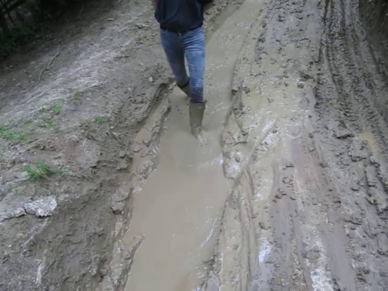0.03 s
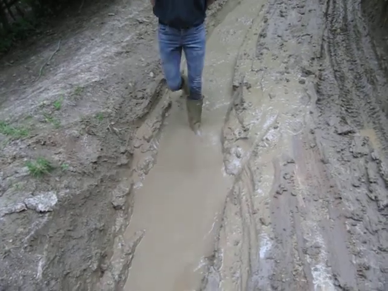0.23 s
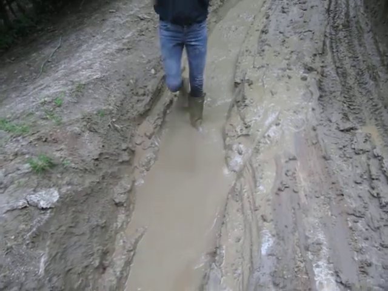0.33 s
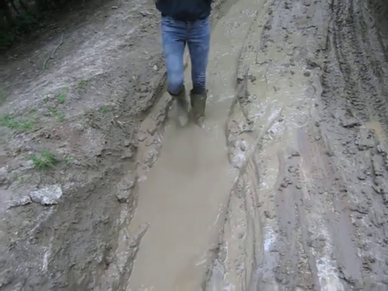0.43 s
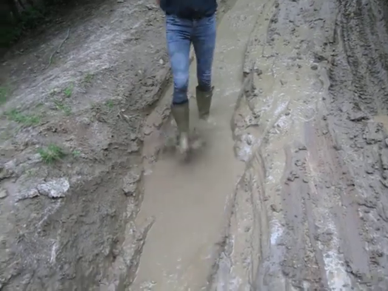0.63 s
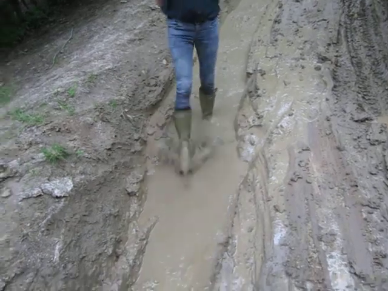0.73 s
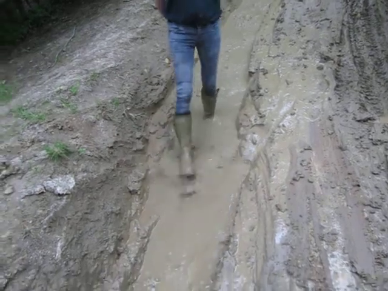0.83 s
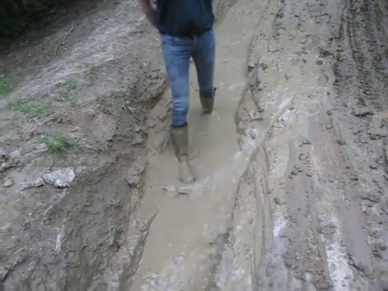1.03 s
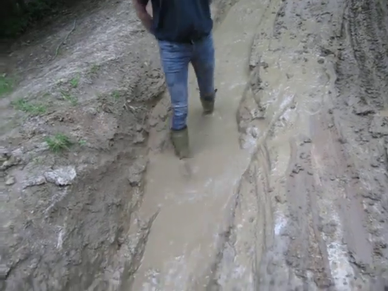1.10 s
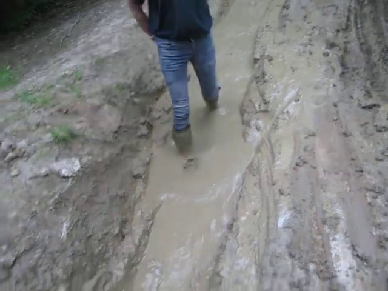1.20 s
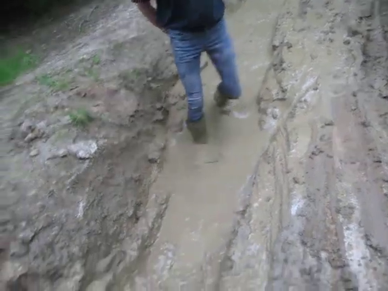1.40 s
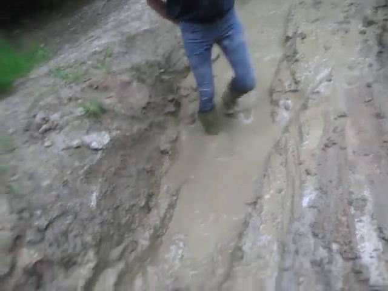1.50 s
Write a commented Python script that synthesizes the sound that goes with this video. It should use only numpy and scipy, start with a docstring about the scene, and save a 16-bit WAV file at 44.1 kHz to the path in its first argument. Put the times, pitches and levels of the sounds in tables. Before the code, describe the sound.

Wading steps in rubber boots splash through a puddle outdoors, heard from a few metres. The water sloshes gently, then more strongly, with gurgling bubbles and scattered drops, before settling into small splashes and soft thuds of the soles.

```python
"""A muddy puddle on a dirt track: rubber boots wade through it, a few metres away.
Each stride throws spray that patters and crackles back and stirs up small ringing bubbles.
Air pockets behind the boots close with rising gulps, lumps of water slap the surface,
drops ping and tick, and the soles thud softly. The rut and its banks add short echoes.
A faint, thin whistle sinks in pitch at the start; faint wind rumbles under the open air."""
import sys
import numpy as np
from scipy import signal
from scipy.fft import rfft, irfft
from scipy.io import wavfile
from scipy.ndimage import uniform_filter1d

SR = 44100
rng = np.random.default_rng(int(sys.argv[2]) if len(sys.argv) > 2 else 0)


def transcribe(u):
    """Save the signal u as a 16-bit wav file named by the first command-line argument.

    u: samples, shape (n,) or (channels, n), limited to [-1, 1]; the rate is SR.
    q: integer samples, one column per channel.
    """
    v = np.clip(np.atleast_2d(u).T, -1, 1)
    q = np.round(v * 32767).astype(np.int16)
    wavfile.write(sys.argv[1], SR, q)


N = 68355
TIME = np.arange(N) / SR
CRACK_HZ, CRACK_Q = 5000, 0.48   # broad band shared by crackle and slaps


def spray():
    """Fine drops ring and crackle on the water over a soft mist."""
    # Each row: time in seconds, level in dB.
    envelope = [(0, -50.5), (.195, -61), (.235, -34), (.32, -46.5), (.44, -42.5), (.468, -26), (.56, -26.5),
                (.62, -30), (.75, -34), (.85, -28.5), (.93, -29), (.99, -33), (1.07, -40), (1.19, -43),
                (1.25, -44), (1.34, -45.5), (1.43, -41), (1.55, -51)]
    # Each row: frequency in Hz, relative level in dB.
    colour = [(1500, -21), (2500, -6.5), (3500, -7), (5000, -9), (8000, -7.5), (10000, -1.5),
              (12000, -16.5), (15500, -4)]
    strength = level(envelope)
    drops = grains(colour, strength, peak_per_s=3000, cycles=40, spread_db=4, pitch_count=64)
    snaps = crackle(strength)
    mist = noise(colour)
    return strength * rms_one(drops + 0.62 * snaps + 0.88 * mist)


def crackle(strength):
    """Dry snaps of drops that hit without ringing."""
    clicks = impacts(strength, peak_per_s=2500, spread_db=5)
    return even(resonate(clicks, CRACK_HZ, CRACK_Q), samples=900)


def churn():
    """Small bubbles ring in the stirred water over a steady-coloured wash."""
    # Each row: time in seconds, level in dB.
    envelope = [(0, -79), (.19, -49.5), (.24, -40.5), (.31, -45.5), (.44, -50), (.47, -37), (.53, -35),
                (.58, -28), (.66, -31.5), (.75, -42.5), (.85, -35.5), (.89, -50.5), (1.05, -41.5),
                (1.18, -47), (1.23, -48), (1.35, -48), (1.48, -47.5), (1.55, -53.5)]
    # Each row: frequency in Hz, relative level in dB.
    colour = [(250, -10.5), (500, -9.5), (800, 2.5), (1300, 6), (2000, 4.5), (2800, 2), (4500, -2.5)]
    strength = level(envelope)
    bubbles = grains(colour, strength, peak_per_s=3700, cycles=16.7, spread_db=5.5, pitch_count=40)
    return strength * rms_one(bubbles + 0.57 * noise(colour))


def gulps(edge_db=7.0, attack_s=0.00048, release_s=0.0017, tremble_hz=232, wobble_hz=90):
    """An air pocket swells and rises in pitch as it surfaces; its trembling wall roughens the note."""
    # Each row: start in seconds, length in seconds, first pitch in Hz, pitch at release in Hz,
    # level in dB, peak position 0-1, roughness 0-1.
    pockets = [(0.234, 0.012, 650, 620, -27.5, 0.07, 0.4), (0.239, 0.014, 280, 327, -32.5, 0.03, 0.23),
               (0.256, 0.02, 570, 770, -32.5, 0.7, 0.35), (0.33, 0.0084, 584, 660, -28.5, 0.14, 0.07),
               (0.340, 0.027, 880, 2130, -22.5, 0.2, 0.52), (0.379, 0.019, 1560, 5340, -34.5, 0.5, 0.77),
               (0.462, 0.011, 1033, 1260, -25, 0.28, 0.38), (0.49, 0.0094, 925, 1006, -26.5, 0.2, .15),
               (0.605, 0.018, 552, 612, -34.5, 0.36, 0.57), (.642, 0.014, 836, 864, -26, 0.74, 0.24),
               (0.687, 0.008, 1450, 1600, -26.5, 0.5, 0.3), (0.72, 0.0097, 1774, 2250, -21.5, 0.7, 0.28),
               (0.727, 0.022, 750, 1200, -35.5, 0.34, 0.15), (.761, 0.019, 589, 695, -28.5, 0.13, 0.2),
               (0.788, 0.03, 743, 2120, -30, 1, 0.2), (0.78, 0.013, 1610, 1750, -29, 0.2, 0.1),
               (0.847, 0.012, 1405, 1475, -27, 0.8, 0.6), (.918, 0.027, 774, 1220, -36.5, 0.04, 0.4),
               (0.955, 0.026, 477, 632, -28.5, 0.6, 0.27), (0.963, 0.044, 894, 1298, -39.5, 0.5, 0.78),
               (1.003, 0.0259, 1400, 2185, -29, 0.28, 0.98), (1.028, 0.06, 437, 1076, -32.5, 1, 0.36),
               (1.088, 0.0081, 1056, 1193, -21, 0.44, 0.1), (1.121, 0.0224, 958, 1225, -33, 0.05, 0.42),
               (1.15, 0.0095, 1460, 1640, -35, 0.3, 0.65), (1.205, 0.036, 443, 703, -36, 0.67, 0.2),
               (1.238, 0.025, 1100, 1745, -20, 0.23, 0.1), (1.284, 0.031, 917, 1350, -38, 0.3, 0.35),
               (1.32, 0.012, 566, 695, -39, 0.3, 0.03), (1.4307, 0.011, 1780, 1870, -35, 0, 0.2),
               (1.463, .008, 1900, 2100, -37, .4, 0.1)]
    out = np.zeros(N)
    tremble = (flutter(tremble_hz) + 1j * flutter(tremble_hz)) / np.sqrt(2)
    wobble = flutter(wobble_hz)
    for start_s, length_s, first_hz, release_hz, db, peak, rough in pockets:
        t = np.maximum(TIME - start_s, 0)
        age = np.minimum(t / length_s, 1)
        after_s = np.maximum(t - length_s, 0)
        hz = 1 / ((1 - age) / first_hz + age / release_hz)   # steady shrinking: ever faster climb
        hz *= (release_hz / first_hz) ** np.minimum(after_s / length_s, 1)   # climbs on as it dies
        hz *= 1 + 0.085 * rough * wobble
        phase = 2 * np.pi * np.cumsum(hz * (t > 0)) / SR
        tone = np.imag((1 + rough * tremble) * np.exp(1j * phase))
        swell = from_db(db - edge_db * np.interp(age, [0, np.clip(peak, 0.02, 0.98), 1], [1, 0, 1]))
        gate = np.minimum(t / attack_s, 1) * np.exp(-np.minimum(after_s / release_s, 20))
        out += swell * gate * tone
    return out


def slaps(attack_s=0.00039, q=2.6):
    """A lump of water lands with a broad crack and a brief ring."""
    # Each row: start in seconds, level in dB, ring centre in Hz, decay in seconds.
    lumps = [(0.224, -38, 2100, 0.0077), (0.232, -32, 1900, 0.0046), (0.273, -37.5, 2680, 0.0057),
             (0.3037, -28.5, 10900, 0.002), (0.3313, -23.5, 1510, 0.00076), (0.367, -32, 2820, 0.0027),
             (0.46, -23, 3170, 0.0025), (0.4629, -19, 7500, 0.0018), (0.5078, -23.5, 7560, 0.015),
             (0.5368, -23, 3430, 0.0069), (.549, -19.5, 2520, 0.0084), (0.567, -21, 1760, 0.0094),
             (0.589, -26, 5100, 0.0027), (0.595, -34, 1380, 0.0046), (0.6412, -28, 7950, 0.0041),
             (0.698, -26.5, 9050, 0.0029), (0.724, -32, 5970, 0.0026), (0.823, -21.5, 5640, 0.0031),
             (0.8423, -22.5, 2160, 0.0091), (0.855, -26.5, 1970, 0.012), (0.895, -21, 9150, 0.0054),
             (0.913, -14.5, 6900, 0.0016), (0.9282, -18, 6800, .0015), (0.9428, -25, 3770, 0.0068),
             (0.948, -21.5, 6540, 0.0046), (1.09, -31, 2700, 0.0033), (1.116, -31, 4420, 0.0048),
             (1.1557, -22.5, 5000, 0.0015), (1.175, -33.5, 4250, 0.016), (1.191, -23.5, 5460, 0.0029),
             (1.1966, -26, 2680, 0.0034), (1.203, -32.5, 5000, 0.0066), (1.367, -34, 3700, 0.0049),
             (1.386, -45, 5000, 0.0026), (1.421, -41, 4200, 0.0024), (1.43, -31, 2520, 0.0018),
             (1.466, -37, 5000, 0.003), (1.494, -39.5, 3100, 0.0068)]
    out = np.zeros(N)
    crack = even(resonate(rng.standard_normal(N), CRACK_HZ, CRACK_Q), samples=60)
    white = rng.standard_normal(N)
    for start_s, db, hz, decay_s in lumps:
        ring = even(resonate(resonate(white, hz, q), hz, q), samples=130)
        out += from_db(db) * burst(start_s, attack_s, decay_s) * (ring + 0.76 * crack)
    return out


def drips(attack_s=0.0011, decay_s=0.002, rise_per_s=4.4):
    """A drop traps a tiny bubble that pings, its pitch creeping up."""
    # Each row: start in seconds, first pitch in Hz, relative level in dB.
    pings = [(0.4742, 3250, -17), (.538, 3670, -16.5), (0.548, 2880, -15.5), (.588, 5580, -20.5),
             (0.63, 3230, -23.5), (.641, 7730, -19), (.699, 9900, -21), (0.712, 7100, -22.5),
             (.915, 2440, -18.5), (0.949, 2520, -19), (1.195, 1220, -20), (1.386, 5800, -35.5),
             (1.415, 2490, -31.5), (1.492, 1394, -26.5), (1.503, 3450, -33.5)]
    out = np.zeros(N)
    for start_s, hz, db in pings:
        t = np.maximum(TIME - start_s, 0)
        phase = 2 * np.pi * hz * t * (1 + rise_per_s * t / 2)
        out += 2 * from_db(db) * burst(start_s, attack_s, decay_s) * np.sin(phase)
    return out


def ticks(decay_s=0.0021, q=0.71):
    """Single drops and bursting films: a sharp snap, then a very short bright spatter."""
    # Each row: start in seconds, level in dB, centre in Hz.
    snaps = [(0.081, -26.5, 9900), (.212, -23.5, 5000), (0.217, -21, 11000), (0.224, -15, 6000),
             (0.2326, -17.5, 5000), (0.3022, -20, 14500), (.365, -19, 6000), (.420, -19, 10000),
             (0.434, -18, 12500), (.509, -12, 7000), (.552, -13, 4500), (0.5696, -13, 4000),
             (0.6994, -9.5, 8000), (.763, -10, 7750), (0.769, -10.5, 9000), (.827, -8, 6000),
             (.868, -15, 7000), (0.9425, -11.5, 5000), (0.9497, -13, 6000), (0.981, -15, 8600),
             (1.006, -19, 9000), (1.022, -14, 5200), (1.1165, -18.5, 6950), (1.197, -17.5, 4000),
             (1.2, -16.5, 5000), (1.397, -22, 7300), (1.424, -18.5, 8600), (1.431, -22, 5500),
             (1.492, -20, 3940)]
    out = np.zeros(N)
    white = rng.standard_normal(N)
    for start_s, db, hz in snaps:
        snap = resonate(signal.unit_impulse(N, int(start_s * SR)), hz, q)
        spatter = burst(start_s, decay_s / 10, decay_s) * even(resonate(white, hz, q), samples=24)
        out += from_db(db) * (snap / np.abs(snap).max() + 0.36 * spatter)
    return out


def thuds(attack_s=0.0023, q=0.69):
    """Soles press into the puddle bed with dull knocks."""
    # Each row: start in seconds, level in dB, centre in Hz, decay in seconds.
    knocks = [(0.59, -46.5, 330, 0.043), (0.849, -38, 367, 0.018), (.953, -52, 260, 0.011),
              (1.074, -41.5, 183, 0.027), (1.16, -35.5, 168, 0.023), (1.170, -39, 276, 0.062),
              (1.268, -41.5, 215, 0.022), (1.442, -48.5, 243, 0.053)]
    out = np.zeros(N)
    white = rng.standard_normal(N)
    for start_s, db, hz, decay_s in knocks:
        body = even(resonate(resonate(white, hz, q), hz, q), samples=700)
        out += from_db(db) * burst(start_s, attack_s, decay_s) * body
    return out


def banks(x, tail_db=-19):
    """Direct sound, two echoes off the rut and its banks, and a short scatter from rough ground."""
    # Each row: delay in seconds, gain in dB.
    reflections = [(.0043, -20), (0.0127, -27)]
    echoes = sum(from_db(db) * np.interp(TIME - delay_s, TIME, x, left=0) for delay_s, db in reflections)
    scatter = resonate(rng.standard_normal(N), hz=1430, q=0.15)
    scatter *= burst(start_s=0.0016, attack_s=0.0011, decay_s=0.009)
    tail = signal.fftconvolve(x, scatter / np.linalg.norm(scatter))[:N]
    return x + echoes + from_db(tail_db) * tail


def whistle(waver_hz=220):
    """A faint, thin, wavering tone that sinks in pitch."""
    # Each row: time in seconds, pitch in Hz, level in dB.
    glide = [(0.091, 8730, -60), (0.14, 8460, -54), (0.208, 8360, -51), (0.319, 7870, -48),
             (.42, 7700, -71.5)]
    times_s, hz, db = np.transpose(glide)
    phase = 2 * np.pi * np.cumsum(np.interp(TIME, times_s, hz)) / SR
    gain = np.interp(TIME, times_s, from_db(db), left=0, right=0)
    return gain * flutter(waver_hz) * np.sin(phase)


def wind(level_db=-47):
    """Faint, steady rumble and hiss of open air."""
    # Each row: frequency in Hz, relative level in dB.
    colour = [(20, 0.5), (60, 2.5), (90, -4), (200, -5.5), (400, -10), (700, -10), (1100, -5.5),
              (2000, -15.5), (4000, -25.5), (8500, -25), (11000, -23.5), (15500, -33)]
    return from_db(level_db) * noise(colour)


def impacts(strength, peak_per_s, spread_db):
    """Random clicks of uneven size; weaker splashing makes fewer."""
    sizes = from_db(spread_db * np.minimum(rng.exponential(1, N), 4))
    signs = rng.choice([-1, 1], N)
    rate_per_s = peak_per_s * (strength / strength.max()) ** 0.2
    return sizes * signs * (rng.random(N) < rate_per_s / SR)


def grains(colour, strength, peak_per_s, cycles, spread_db, pitch_count):
    """Random impacts, each swelling briefly and ringing at one of many pitches."""
    clicks = impacts(strength, peak_per_s, spread_db)
    pitch_index = rng.integers(0, pitch_count, N)
    q = cycles * np.pi / np.log(1000)   # 60 dB down after that many cycles
    rings = np.zeros(N)
    for k, hz in enumerate(np.geomspace(colour[0][0], colour[-1][0], pitch_count)):
        ring = resonate(clicks * (pitch_index == k), hz, q)
        rings += colour_gain(colour, hz) * resonate(ring, hz, q / 3)   # second pass softens the onset
    return even(rings, samples=900)


def from_db(db):
    """Decibels to gain."""
    return 10 ** (np.asarray(db) / 20)


def rms_one(x):
    """Scale to unit power."""
    return x / np.sqrt(np.mean(x ** 2) + 1e-20)


def level(envelope):
    """Gain over time from (s, dB) points."""
    return from_db(np.interp(TIME, *np.transpose(envelope)))


def colour_gain(colour, hz):
    """Gain at a frequency from (Hz, dB) points."""
    points_hz, db = np.transpose(colour)
    return from_db(np.interp(np.log(hz + 1), np.log(points_hz), db))


def noise(colour):
    """Coloured noise of unit power."""
    gain = colour_gain(colour, np.fft.rfftfreq(N, 1 / SR))
    return rms_one(irfft(rfft(rng.standard_normal(N)) * gain, N))


def flutter(hz):
    """Low-passed random motion of unit power."""
    return rms_one(signal.sosfilt(signal.butter(2, hz, fs=SR, output="sos"), rng.standard_normal(N)))


def resonate(x, hz, q):
    """One resonance with unit peak gain."""
    angle = 2 * np.pi * min(hz, 0.45 * SR) / SR
    radius = np.exp(-angle / (2 * q))
    zeros = np.array([1, 0, -1]) * (1 - radius ** 2) / 2
    return signal.lfilter(zeros, [1, -2 * radius * np.cos(angle), radius ** 2], x + 1e-18)


def even(x, samples):
    """Hold the local power near one."""
    power = uniform_filter1d(uniform_filter1d(x * x, samples), samples)
    return x / np.sqrt(np.abs(power) + 1e-20)


def burst(start_s, attack_s, decay_s):
    """Quick rise, exponential fall."""
    t = np.maximum(TIME - start_s, 0)
    return (1 - np.exp(-t / attack_s)) * np.exp(-np.minimum(t / decay_s, 40))


def scene():
    """Water and boots between the banks, plus whistle and wind; mono."""
    water = spray() + churn() + gulps() + slaps() + drips() + ticks() + thuds()
    return (banks(water) + whistle() + wind())[None]


def record(dry, mic_top_hz=10690, cutoff_hz=15900):
    """The microphone dulls the treble; a steep low-pass cuts the very top."""
    dull = signal.sosfilt(signal.butter(4, mic_top_hz, fs=SR, output="sos"), dry)
    return signal.sosfilt(signal.ellip(12, 0.1, 80, cutoff_hz, fs=SR, output="sos"), dull)


dry = scene()
out = record(dry)
transcribe(out)
```